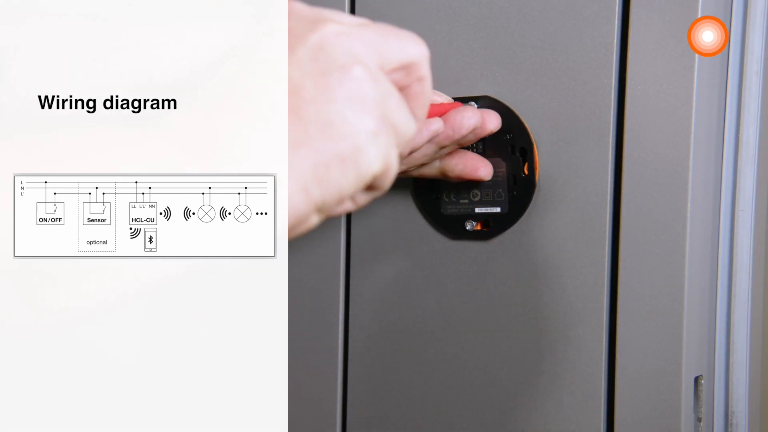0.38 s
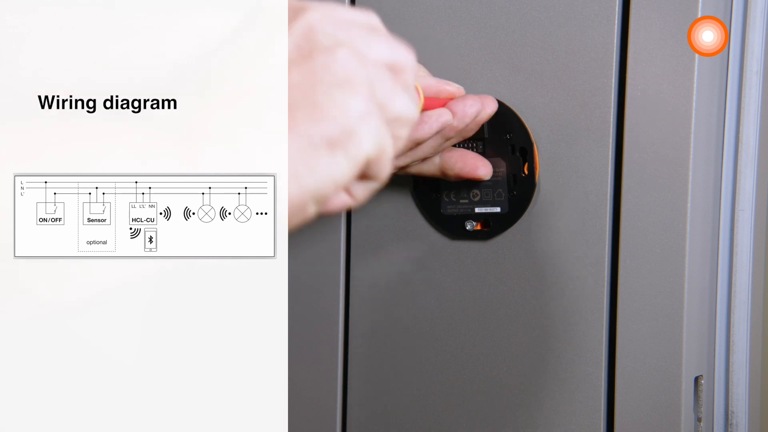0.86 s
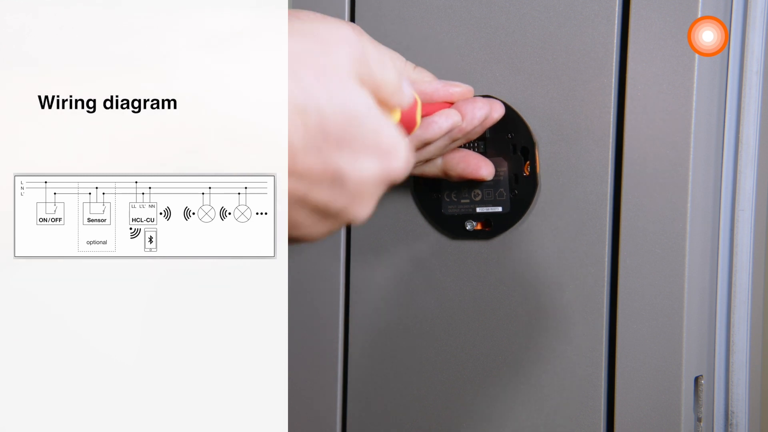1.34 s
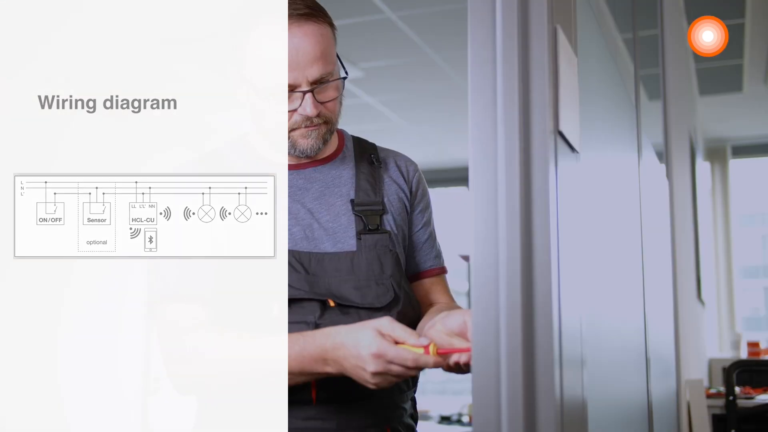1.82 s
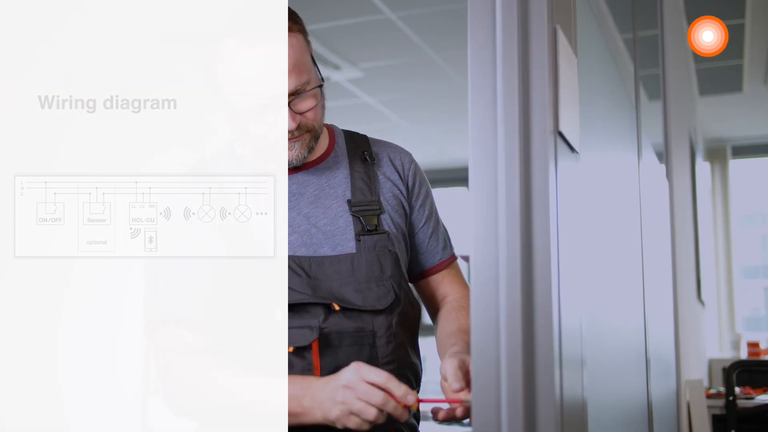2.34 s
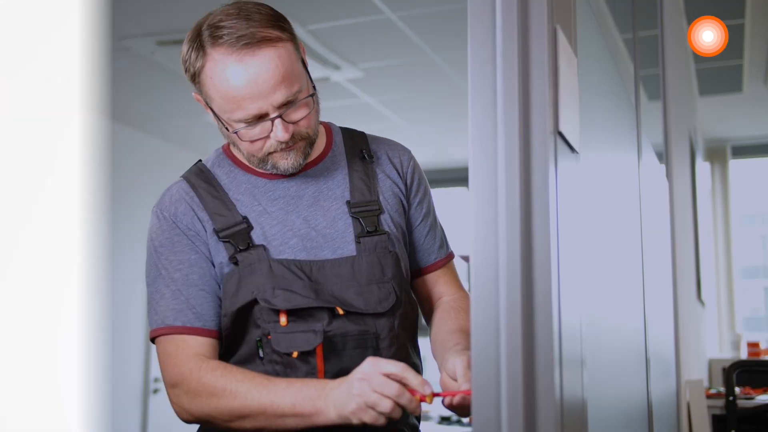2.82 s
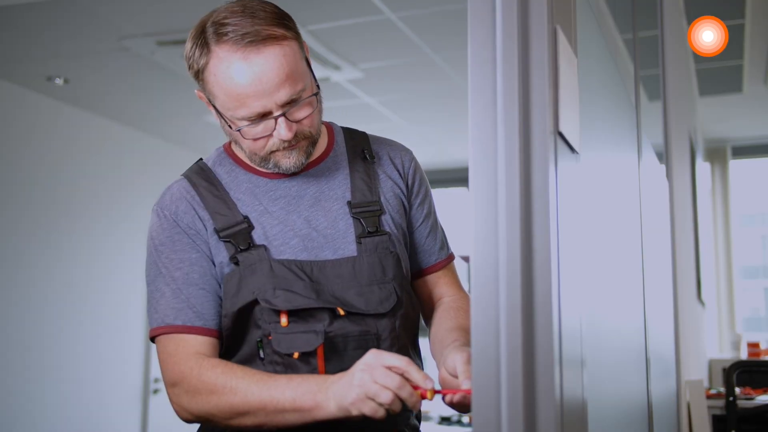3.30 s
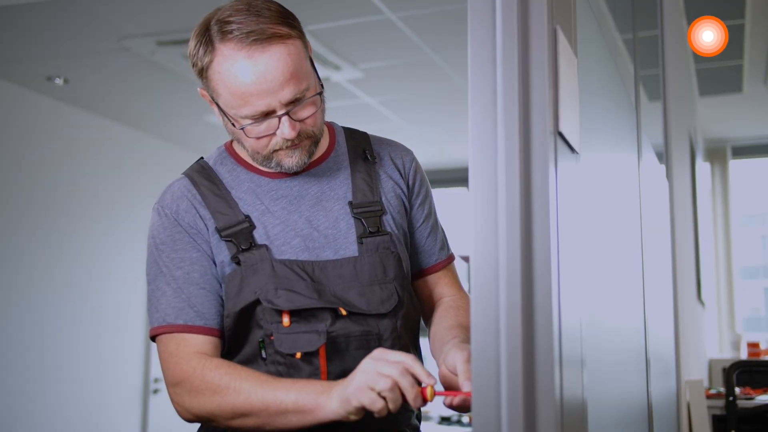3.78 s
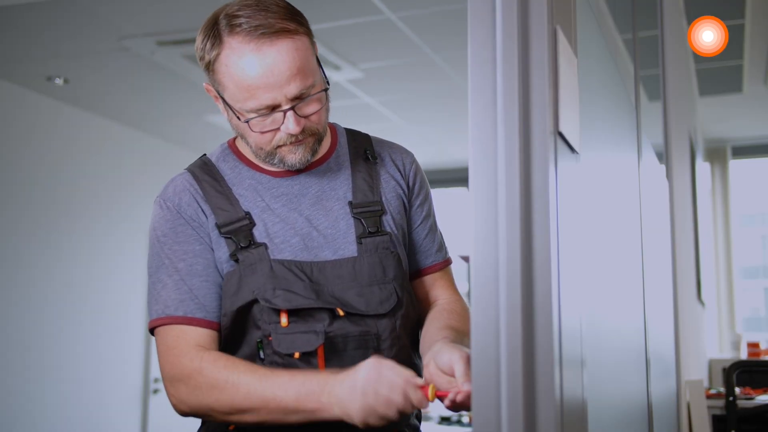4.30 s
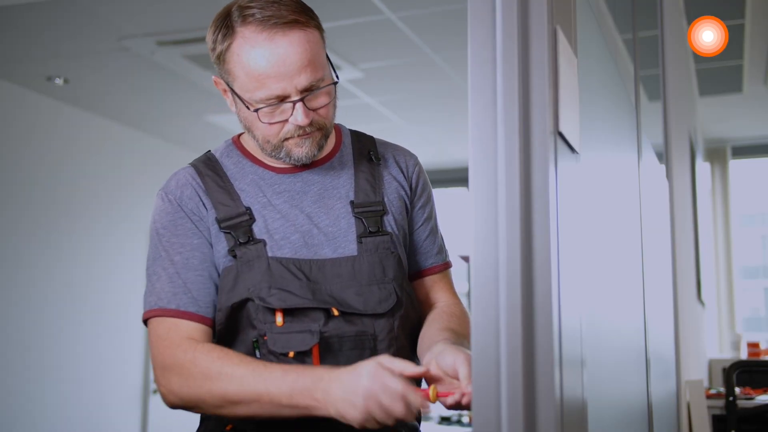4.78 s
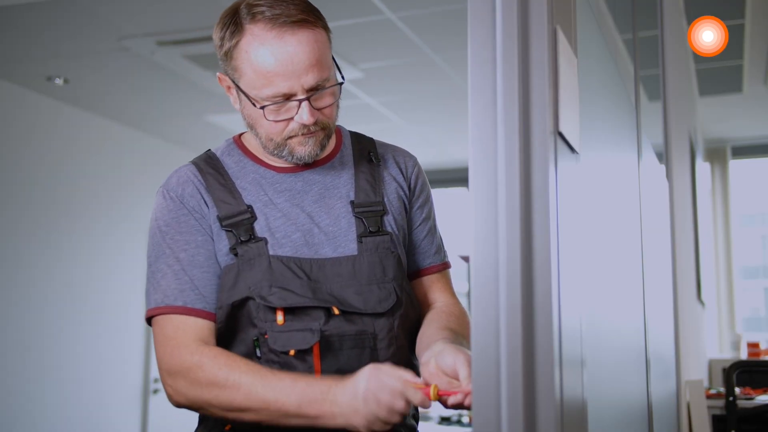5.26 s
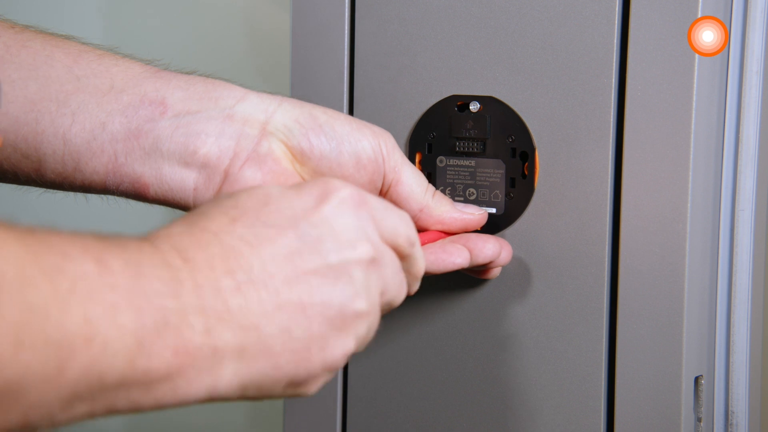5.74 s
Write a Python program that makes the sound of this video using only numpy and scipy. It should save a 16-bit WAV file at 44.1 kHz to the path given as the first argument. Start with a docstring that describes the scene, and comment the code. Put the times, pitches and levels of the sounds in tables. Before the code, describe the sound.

A hand screwdriver works small screws in a plastic box in a hollow wall panel, with irregular clicks, knocks and skin swishes in a quiet office.

```python
"""Hand screwdriver at a hollow wall

A hand screwdriver turns small screws into a plastic box set in a hollow wall panel, in a quiet office.
The blade slips and knocks in the slot: chattering contacts crack and ring panel, box and shaft.
Between turns fingers swish over the handle in dense skin slips; the thread grinds faintly in lumps.
Shaped noise makes the low ventilation hum, and a noise tail gives the room's diffuse echoes."""
import sys
import numpy as np
from scipy import signal
from scipy.fft import rfft, irfft
from scipy.io import wavfile

SR = 44100
rng = np.random.default_rng(int(sys.argv[2]) if len(sys.argv) > 2 else 0)


def generate_wav(sig):
    """Save sig (samples, or channels by samples) to the path in sys.argv[1] as 16-bit PCM at SR."""
    pcm = np.round(np.clip(np.atleast_2d(sig).T, -1, 1) * 32767).astype(np.int16)
    wavfile.write(sys.argv[1], SR, pcm)


def how_loud(loudness_db):
    """Turn decibels into a plain amplitude multiplier (0 dB gives 1, 20 dB gives 10)."""
    steps = np.asarray(loudness_db, float) / 20
    return 10 ** steps


N = 259308

# blade knocks in the slot; body levels are rms over the first 8 ms, ahead of the bass cut:
# start_s, tick_peak_db, panel_db, box_db, shaft_db, favoured_box_hz, favoured_shaft_hz
SLOT_KNOCKS = [(0.378, -49.5, -49, -72, -69, 740, 2070), (0.4042, -52.5, -58, -62.5, -73, 740, 1960),
               (0.4887, -56.5, -47, -53.5, -71, 537, 2000), (0.918, -77, -58, -59, -87, 740, 1960),
               (0.9584, -60, -52, -64, -70, 740, 1960), (1.0203, -42, -46, -49.5, -49.5, 710, 1900),
               (1.287, -51, -52.5, -57, -63, 680, 1940), (1.2925, -55, -50, -60.5, -65, 680, 1970),
               (1.3197, -36, -41, -36.5, -49.5, 740, 1990), (1.5932, -45, -57, -43.5, -63, 740, 1150),
               (1.598, -45, -49, -63, -58, 740, 1470), (1.607, -48.5, -63, -75, -65, 740, 2020),
               (1.7388, -70, -53.5, -45.5, -66, 740, 1160), (1.8794, -36.5, -35.5, -28.5, -47.5, 740, 1160),
               (3.0318, -51.5, -54, -62, -64.5, 615, 1160), (3.05, -59, -55, -68, -70, 620, 1790),
               (3.3026, -49, -50.5, -51.5, -60, 582, 1160), (3.329, -63, -54, -65, -71.5, 550, 1780),
               (3.5993, -59, -57, -69, -72, 740, 1790), (3.7042, -42.5, -41.5, -43.5, -55.5, 646, 1820),
               (3.739, -57, -46, -57, -60.5, 770, 1160), (3.824, -45.5, -45, -51, -63, 620, 1160),
               (3.8514, -67, -52, -60.5, -70, 740, 1790), (4.006, -56, -61, -55, -75, 740, 1160),
               (4.0161, -18, -26.5, -22, -33.5, 636, 1810), (4.022, -29, -50, -36, -41, 740, 1790),
               (4.2038, -38, -87, -43.5, -45, 740, 1245), (4.755, -46.5, -52.5, -57, -54.5, 746, 1260),
               (4.815, -56, -57.5, -67, -63, 740, 1380), (4.9774, -52, -54.5, -67, -60.5, 740, 1160),
               (5.0494, -40.5, -69, -50.5, -52.5, 688, 1245), (5.1534, -44.5, -49, -47, -51.5, 597, 1290),
               (5.282, -55.5, -46.5, -49, -54.5, 540, 1380), (5.367, -35.5, -60, -52, -48, 540, 1780),
               (5.5218, -37.5, -38, -39, -44.5, 680, 1500), (5.824, -82, -49, -69, -84, 572, 1490)]
# what rings, below 500 Hz the panel, to 1 kHz the box, above it the shaft; relative levels before
# each blow's luck and favoured pitches: pitch_hz, level_db, t60_s
BODY_MODES = [(229.5, -10, 0.051), (304.5, -15.5, 0.13), (325, 3, 0.029), (515, -6.5, 0.035),
              (540, -5, 0.012), (618, 0.5, 0.023), (658, -17.5, 0.11), (740, -5, 0.036), (840, 1.5, 0.015),
              (920, -9.5, 0.048), (1027, 3, 0.019), (1160, 5.5, 0.025), (1245, 4.5, 0.015),
              (1380, 2, 0.023), (1538, -2.5, 0.017), (1680, -11, 0.035), (1689, 2.5, 0.025),
              (1946, 1.5, 0.02), (2147, -8, 0.048), (2260, -24, 0.0017)]
# relative spectrum of sliding skin: frequency_hz, density_db (per Hz)
SKIN_SPECTRUM = [(590, -2.5), (1000, -1), (2040, -6), (2560, -2.5), (3180, -10), (4120, -9), (4670, -12.5),
                 (15000, -15.5)]


def rms_one(x):
    """Scale to unit rms."""
    return x / np.sqrt(np.mean(x ** 2) + 1e-20)


def in_time(rows):
    """Columns of a curve at every sample."""
    s, *columns = np.transpose(rows)
    return [np.interp(np.arange(N) / SR, s, c) for c in columns]


def at_hz(points, hz):
    """A curve over frequency read on a log-frequency axis."""
    point_hz, value = np.transpose(points)
    return np.interp(np.log(hz + 1), np.log(point_hz), value)


def coloured(x, spectrum):
    """Shape a signal with a spectrum in dB; rms 1."""
    gain = how_loud(at_hz(spectrum, np.fft.rfftfreq(N, 1 / SR)))
    return rms_one(irfft(rfft(x) * gain, N))


def band_passed(x, low_hz, high_hz):
    """Keep what lies between two frequencies."""
    return signal.sosfilt(signal.butter(2, [low_hz, high_hz], "band", fs=SR, output="sos"), x)


def drift(rate):
    """Slow random wandering of rms 1; rate is the corner in Hz."""
    r = np.exp(-2 * np.pi * rate / SR)
    noise = rng.standard_normal(N + SR)
    return rms_one(signal.lfilter([1], [1, -2 * r, r * r], noise)[SR:])


def ring(clicks, hz, t60):
    """A damped resonance: a unit click sets a dying sine of height 1 ringing."""
    r, w = how_loud(-60 / (t60 * SR)), 2 * np.pi * hz / SR
    return signal.lfilter([0, np.sin(w)], [1, -2 * r * np.cos(w), r * r], clicks + 1e-18)


def fading(kicks, t60):
    """Every kick dies away exponentially, by 60 dB in t60 seconds."""
    return signal.lfilter([1], [1, -how_loud(-60 / (t60 * SR))], kicks)


def grains(per_s, spread_db):
    """Random tiny impacts of uneven size; rms 1."""
    sizes = how_loud(spread_db * np.minimum(rng.exponential(1, N), 5)) * rng.choice([-1, 1], N)
    return rms_one(sizes * (rng.random(N) < per_s / SR))


def body(rubbing, low_hz, high_hz):
    """Soft rubbing heard through the modes between two pitches; rms 1."""
    rings = sum(how_loud(db) * ring(rubbing, hz, t60) for hz, db, t60 in BODY_MODES if low_hz < hz < high_hz)
    return rms_one(band_passed(rings, low_hz, high_hz))


def ventilation():
    """Steady moving air: noise weighted towards the low end, heard as a hum beneath the work."""
    # relative spectrum of the air: frequency_hz, density_db (per Hz)
    air_spectrum = [(15, -65), (25, -18), (49, 14), (125, 17.5), (213, 13), (438, 4.5), (729, -2),
                    (790, -4.5), (1810, -12.5), (1960, -42), (4500, -14), (15000, -15.5)]
    return how_loud(-70.5) * coloured(rng.standard_normal(N), air_spectrum)


def dying_gain(s, db, t60):
    """A gain that leaps up at each knock and dies away exponentially."""
    kicks = np.zeros(N)
    kicks[np.round(s * SR).astype(int)] = how_loud(db)
    return fading(kicks + 1e-18, t60)


def thread_grind():
    """The thread's teeth catch as sparse grains that ring panel and box; rms 1."""
    teeth = grains(1200, spread_db=2.0)
    panel = body(teeth, low_hz=193, high_hz=614)
    box = body(teeth, low_hz=680, high_hz=907)
    return rms_one(panel + how_loud(-3.5) * box)


def thread_scratch():
    """The thread's brighter scratch: denser grains with most strength near 1.2 kHz; rms 1."""
    return coloured(grains(3500, spread_db=3.5), [(700, -35), (1200, 1.5), (2600, -6), (3800, -4.5),
                                                  (5000, -9.5), (9000, -13), (13000, -12)])


def skin_rustle(effort):
    """Skin slips in wavering grains; a flickering airy top follows the turning effort."""
    rustle = coloured(grains(4100, spread_db=1.5), SKIN_SPECTRUM) * how_loud(-80 + 3.6 * drift(4.0))
    airy = coloured(rng.standard_normal(N), [(7000, -22), (10500, 2), (14000, 3)])
    return rustle + airy * how_loud(-90 + 3.0 * drift(9)) * effort


def noisy_tail(s, shaft_db):
    """A diffuse noisy tail after each knock, strongest near 1 kHz, set by the knock's shaft level."""
    noise = coloured(grains(6000, spread_db=3.5), [(600, -6), (1050, 17.5), (1900, -5.5), (2800, -8.5),
                                                   (4000, -14.5), (6000, -15), (15000, -37)])
    return noise * dying_gain(s + 0.0046, shaft_db - 9, t60=0.13)


def hand_thud():
    """The leaning hand works the panel: noise around 95 to 190 Hz; rms 1."""
    return coloured(rng.standard_normal(N), [(60, -22.0), (95, 6.0), (190, 4.5), (280, -29.0)])


def turning():
    """Hand pressure makes the thread bite in lumps, skin rustle and the hand thud; knocks leave tails."""
    # hand pressure on the screw, without lumps or after-ring: start_s, grind_db, thud_db
    pressure = [(0.0, -74.5, -76), (0.2, -72.5, -77), (0.75, -72, -74.5), (0.88, -68.5, -75),
                (1.05, -73, -67), (1.18, -69, -79), (1.6, -72.5, -74), (2.02, -66.5, -67), (2.07, -67, -63),
                (2.11, -61, -57), (2.135, -68, -77), (2.17, -72, -97), (2.3, -64.5, -76),
                (2.52, -76.5, -85), (3.55, -82.5, -78.5), (3.64, -80, -80), (3.685, -81, -61),
                (3.72, -73.5, -75), (4.17, -65, -75), (4.22, -75, -61), (4.38, -69, -75.5),
                (4.6, -65.5, -76), (4.88, -68, -82), (4.94, -69, -87), (5.2, -79.5, -69), (5.31, -71, -79),
                (5.88, -70, -76)]
    grind_db, thud_db = in_time(pressure)
    s, _, panel_db, box_db, shaft_db, *_ = np.transpose(SLOT_KNOCKS)
    # the low, dying after-ring of wall and room following each knock
    after_db, after_t60_s = -22.5, 0.31     # level against the knock's box or panel level
    bite = how_loud(grind_db) + dying_gain(s, box_db + after_db, after_t60_s)
    lean = how_loud(thud_db) + dying_gain(s, panel_db + after_db, after_t60_s)
    effort = (bite / how_loud(grind_db.mean())) ** 0.44     # a share of the grind's swing in dB
    lumps = how_loud(1.0 * drift(9.8))
    thread = lumps * (bite * thread_grind() + how_loud(-78.5) * effort * thread_scratch())
    return thread + skin_rustle(effort) + noisy_tail(s, shaft_db) + lean * hand_thud()


def blows():
    """Knocks and ticks as rows (s, tick, panel, box, shaft dB, box, shaft Hz, chatter ms, fall dB)."""
    # the blade tip grazes the screw head and hardly moves the wall:
    # start_s, tick_peak_db, shaft_db, tick_fall_db (per octave), favoured_shaft_hz
    grazes = [(0.147, -61, -66, 20, 1600), (0.3185, -65, -71.5, 14, 1550), (0.9016, -48, -63, 14.5, 1260),
              (0.968, -47, -60, 15.5, 1980), (1.465, -51.5, -66, 5, 1950), (1.76, -55, -70, 8, 1800),
              (1.8845, -44.5, -54.5, 7, 2050), (2.048, -49, -69, 12, 1180), (2.0533, -39, -55.5, 4, 1140),
              (2.142, -66, -83, 2, 1170), (2.081, -70, -83, -2.5, 1170), (2.247, -40, -50, 7.5, 1830),
              (3.206, -66, -78, 10, 1800), (3.774, -45.5, -61, -3, 1740), (3.982, -60, -79, -3, 1600),
              (4.171, -53, -78, 5, 1610), (4.1916, -41, -46, 7.5, 1380), (4.311, -63, -63, 13, 1250),
              (4.328, -49.5, -53, 13, 1380), (4.5943, -52, -52, 11, 1370), (4.725, -61, -68, 22, 1790),
              (5.022, -74, -67, 10, 1380), (5.033, -65, -64, -1, 1700), (5.0546, -37, -47.5, 6.5, 1245),
              (5.3472, -46.5, -50.5, 2, 1530), (5.39, -51, -81, -2, 1600), (5.5889, -52.5, -51, 8, 1490)]
    rows = []
    for knock in SLOT_KNOCKS:
        harder_db = max(knock[1] + 40, 0)     # how far the tick exceeds -40 dB; softer knocks count as 0
        chatter_ms = 7.2 * np.exp(-0.035 * harder_db)     # a harder knock seats the blade sooner
        fall_db = 8.5 - 0.14 * harder_db     # and falls off less per octave of treble
        rows.append((*knock, chatter_ms, fall_db))
    for s, tick_db, shaft_db, fall_db, shaft_hz in grazes:
        panel_db, box_db = shaft_db - 9, shaft_db - 8.5
        box_hz, chatter_ms = 787, 6.9
        rows.append((s, tick_db, panel_db, box_db, shaft_db, box_hz, shaft_hz, chatter_ms, fall_db))
    return rows


def causal(colour, length):
    """Minimum-phase response of a gain spectrum: resonances ring after the contact, never before."""
    cepstrum = irfft(np.log(colour + 1e-6), length)
    cepstrum[1:length // 2] *= 2
    cepstrum[length // 2 + 1:] = 0
    return np.exp(rfft(cepstrum))


def blade_colour(s, fall_db, pitch_scatter, hz_axis):
    """Gain spectrum of a contact: falling treble, peaks of the steel and the seated blade's ping."""
    # steel peaks; each blow scales the lift by 1.5 on average and scatters the pitch a little:
    # pitch_hz, width_hz, unscaled_lift_db
    steel_peaks = [(2850, 190, 2.5), (3850, 590, 1.6), (4620, 530, 2.3), (7030, 240, 2.7),
                   (10600, 10300, 12.7)]
    # pitch at which the seated blade pings: start_s, pitch_hz
    blade_pitch = [(0, 3240), (1.35, 3420), (1.55, 4800), (2.1, 4650), (2.2, 3270), (3.0, 3620),
                   (4.1, 3850), (4.18, 3220), (5.88, 3290)]
    colour = how_loud(-fall_db * np.log2(hz_axis / 2500 + 1e-3))
    colour /= 1 + (1900 / (hz_axis + 1)) ** 6
    colour /= 1 + (hz_axis / 12500) ** 6
    luck = rng.standard_normal((len(steel_peaks), 2))
    for (hz, width_hz, db), (loud, shift) in zip(steel_peaks, luck):
        peak = np.exp(-((hz_axis - hz * (1 + pitch_scatter * shift)) / width_hz) ** 2)
        colour *= how_loud(db * (1.5 + 0.58 * loud) * peak)
    ping_hz = np.interp(s, *np.transpose(blade_pitch))
    return colour * how_loud(8 * np.exp(-((hz_axis - ping_hz) / 340) ** 2))     # lift in dB, width in Hz


def blade_crack(contacts, s, fall_db, pitch_scatter, tick_t60_s):
    """Each contact sets off a dying burst of grit, coloured by the blade; peak 1."""
    # later contacts are duller: above_hz, fade_ms (time constant)
    treble_fades = [(3500, 27), (7500, 9)]
    length = len(contacts)
    ms = np.arange(length) * 1000 / SR
    crack = rng.standard_normal(length) * fading(np.abs(contacts), tick_t60_s)
    colour = blade_colour(s, fall_db, pitch_scatter, np.fft.rfftfreq(length, 1 / SR))
    crack = irfft(rfft(crack) * causal(colour, length), length)
    crack *= np.clip(1 - ms / ms[-1] * 2, 0, 1)
    for above_hz, fade_ms in treble_fades:
        treble = signal.lfilter(*signal.butter(1, above_hz, "high", fs=SR), crack)
        crack = crack - treble * (1 - np.exp(-ms / fade_ms))
    return crack / np.abs(crack).max()


def rung_parts(contacts, part_db, box_hz, shaft_hz, level_scatter_db, pitch_scatter):
    """Contacts ring the modes of panel, box and shaft, most near the pitches the blow favours."""
    # upper edges of panel, box and shaft: edge_hz
    part_edges = [500, 1000, 2500]
    parts = np.zeros((3, len(contacts)))
    luck = rng.standard_normal((len(BODY_MODES), 2))
    for k, ((hz, level_db, t60), (loud, shift)) in enumerate(zip(BODY_MODES, luck)):
        # where and how the blade lands lifts the modes near one pitch; the shaft's lift is weaker
        for liked_hz, share in ((box_hz, 1), (shaft_hz, 0.6)):
            level_db += 13.5 * share * np.exp(-(np.log2(hz / liked_hz) / 0.14) ** 2)     # octaves
        # neighbouring modes start in opposite directions
        gain = (-1) ** k * how_loud(level_db + level_scatter_db * loud)
        # each mode's pitch is scattered slightly at random per blow
        mode = ring(contacts, hz * (1 + pitch_scatter * shift), t60)
        parts[np.searchsorted(part_edges, hz)] += gain * mode
    total = 0
    for part, db, edge_hz in zip(parts, part_db, part_edges):
        # heavier parts start more slowly
        part = signal.lfilter(*signal.butter(2, 0.93 * edge_hz, fs=SR), part)
        total = total + how_loud(db) * part / part[:SR // 125].std()     # level over the first 8 ms
    return total


def knocks(level_scatter_db, pitch_scatter, tick_t60_s):
    """Each blow is a dying chatter of contacts: it rings the modes and cracks broadly above them."""
    out, length = np.zeros(N + SR), SR // 4
    ms = np.arange(length) * 1000 / SR
    for s, tick_db, *part_db, box_hz, shaft_hz, chatter_ms, fall_db in blows():
        touching = rng.random(length) < 2500 / SR     # 2500 contacts per second
        contacts = rng.standard_normal(length) * touching * np.exp(-ms / max(chatter_ms, .2))
        contacts[0] = -3.2     # a firm first contact
        sound = how_loud(tick_db) * blade_crack(contacts, s, fall_db, pitch_scatter, tick_t60_s)
        sound += rung_parts(contacts, part_db, box_hz, shaft_hz, level_scatter_db, pitch_scatter)
        out[round(s * SR):][:length] += sound
    # the knocks carry almost nothing below about 240 Hz
    return signal.sosfilt(signal.butter(4, 240, "high", fs=SR, output="sos"), out[:N])


def patchy(slips):
    """Skin grips unevenly: each band of the slips wavers on its own."""
    edges = np.geomspace(500, 17000, 11)
    patches = np.zeros(N)
    for k, (low_hz, high_hz) in enumerate(zip(edges, edges[1:])):
        band = band_passed(slips, low_hz, high_hz) * how_loud(1.5 * drift(70))
        patches += band * (-1) ** k     # alternating signs join the bands evenly
    return patches


def swishes():
    """Skin slips in dense grains: a patchy hiss with a broad squeak, and some of it shakes box and shaft."""
    # fingers sliding on the handle; hiss is the level at the end, swell its rise from start to end,
    # box, shaft and squeak stand against the hiss:
    # start_s, end_s, hiss_db, box_db, shaft_db, swell_db, squeak_hz, squeak_db
    slides = [(0.686, 0.769, -56.5, -9.5, -23, 16, 2370, -17.5), (0.815, 0.85, -80, 3, -7, 0, 13500, 4),
              (0.938, 0.963, -69, -14, -22, 7, 14000, -2), (1.098, 1.113, -64.5, -13, -9, -5, 9000, -13),
              (1.137, 1.16, -77, -12, -21, -2, 4050, -9), (1.174, 1.177, -72, -19, -12, -1, 12100, 2.5),
              (1.397, 1.42, -53.5, -17.5, -21, 2.5, 13700, -10), (1.765, 1.768, -77, 1, 13, 2, 4000, -7),
              (2.003, 2.014, -68.5, 6, -3, 6, 2000, -13), (1.849, 1.887, -63.5, 5.5, -19, 1.5, 5000, -15),
              (2.07, 2.158, -72, 6, -4, 0, 3800, -7), (4.416, 4.465, -77, 7.5, -1, -1.5, 3870, -6),
              (4.513, 4.655, -78.5, 8, -12, 5, 3670, 0), (4.762, 4.794, -68.5, -1, -6, -2.5, 6900, -4.5),
              (4.826, 4.89, -77, 1, -6, -6, 3500, -7), (5.07, 5.102, -64, 1.5, -22, 2, 7300, -6),
              (5.415, 5.427, -65.5, 1.5, -9, 1, 6960, -9)]
    rise_db_per_s, fall_db_per_s = 499, 898
    slips = grains(10000, spread_db=3.2)
    patches = patchy(slips)
    hiss = coloured(patches, SKIN_SPECTRUM)
    box = body(slips, low_hz=607, high_hz=900)
    shaft = body(patches, low_hz=980, high_hz=2780)
    t, out = np.arange(N) / SR, np.zeros(N)
    for start, end, db, box_db, shaft_db, swell_db, squeak_hz, squeak_db in slides:
        level_db = np.interp(t, [start, end], [db - swell_db, db])
        level_db += rise_db_per_s * np.minimum(t - start, 0)
        level_db += fall_db_per_s * np.minimum(end - t, 0)
        squeak = rms_one(signal.lfilter(*signal.iirpeak(squeak_hz, 2.2, fs=SR), slips))
        slide = hiss + how_loud(box_db) * box + how_loud(shaft_db) * shaft + how_loud(squeak_db) * squeak
        out += how_loud(level_db) * slide
    return out


def office(x, first_echo_s):
    """Diffuse echoes: noise in octave bands, each dying at its own rate."""
    # decay of the room: frequency_hz, t60_s
    room_decay = [(100, 0.46), (300, 0.52), (800, 0.21), (1400, 0.49), (2800, 0.32), (6000, 0.18),
                  (14000, 0.15)]
    t = np.arange(SR // 2) / SR
    tail = np.zeros(len(t))
    for hz in 90 * 2. ** np.arange(8):
        band = band_passed(rng.standard_normal(len(t)), hz / np.sqrt(2), hz * np.sqrt(2))
        tail += band * how_loud(-60 * t / at_hz(room_decay, hz))
    tail *= np.clip(t / first_echo_s - 1, 0, 1)     # silent before the first echo, then fading in
    return signal.fftconvolve(x, tail / np.sqrt(np.sum(tail ** 2)))[:N]


def scene():
    """Hands at the wall, their echoes and the air."""
    air = ventilation()
    hands = turning() + knocks(level_scatter_db=1.5, pitch_scatter=.012, tick_t60_s=0.0048) + swishes()
    echoes = how_loud(-23) * office(hands, first_echo_s=.007)
    return (hands + echoes + air)[None]


def roll_off(x):
    """The treble ends steeply here."""
    return signal.sosfilt(signal.butter(12, 16670, fs=SR, output="sos"), x)


def record(dry):
    """The microphone drops the deepest bass and the very top."""
    mix = signal.sosfilt(signal.butter(3, 48, "high", fs=SR, output="sos"), dry)
    mix = signal.sosfilt(signal.cheby2(14, 45, 16300, fs=SR, output="sos"), mix)
    return roll_off(mix)


dry = scene()
out = record(dry)
generate_wav(out)
```